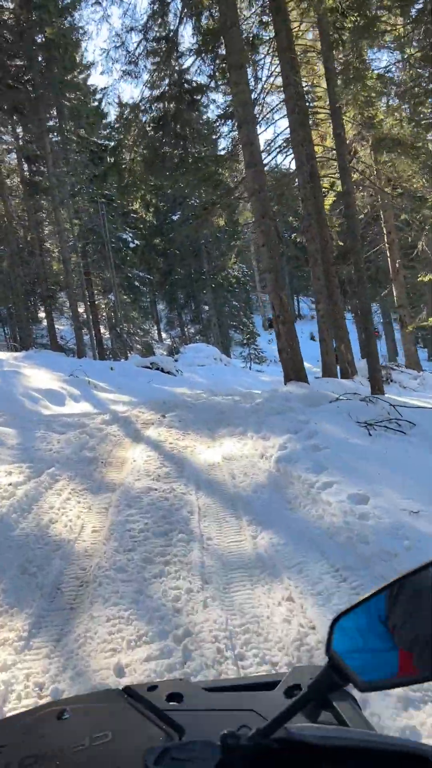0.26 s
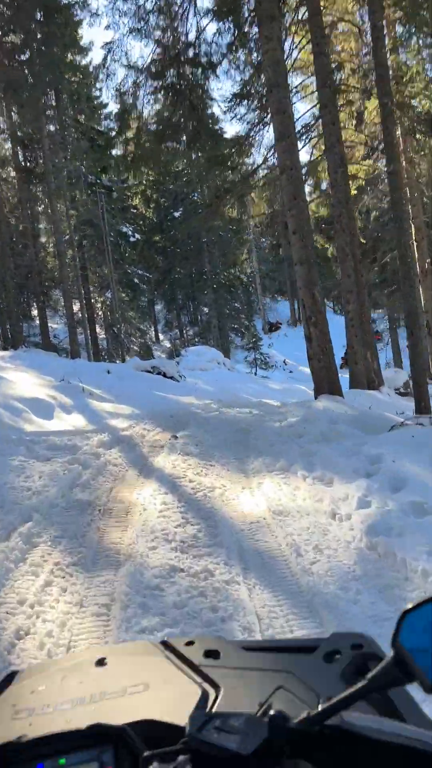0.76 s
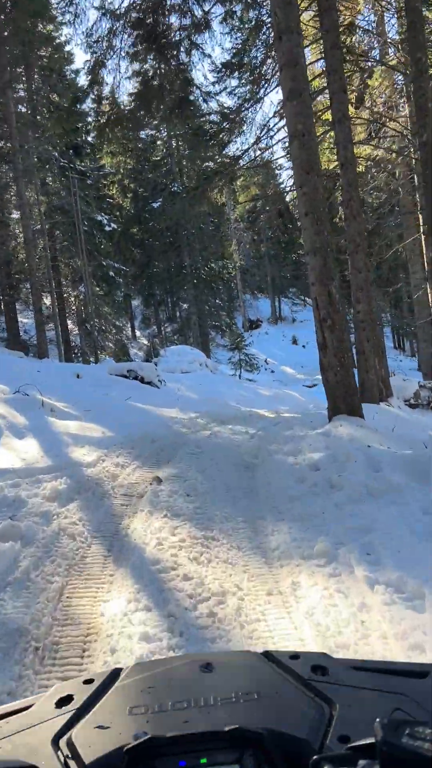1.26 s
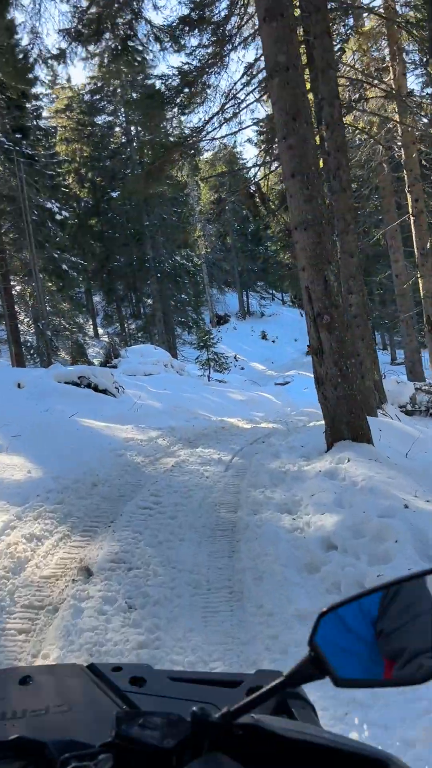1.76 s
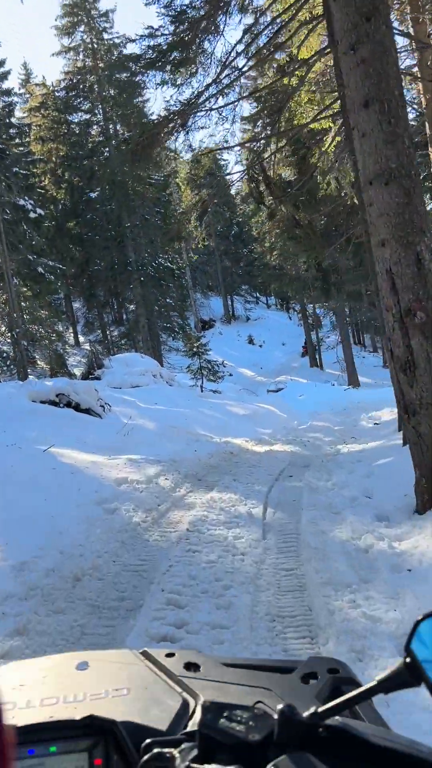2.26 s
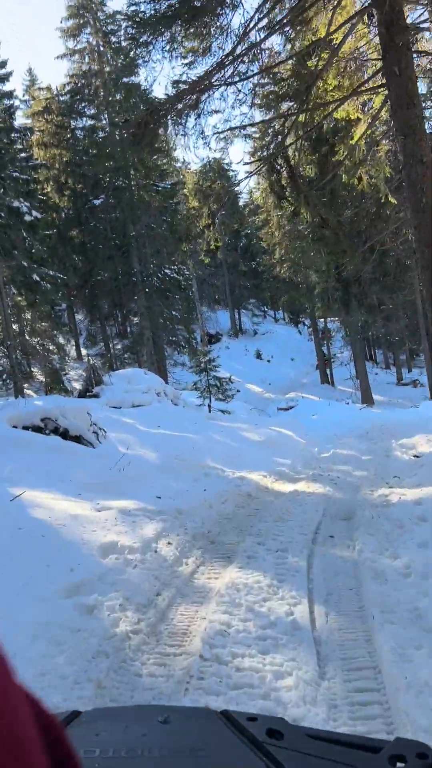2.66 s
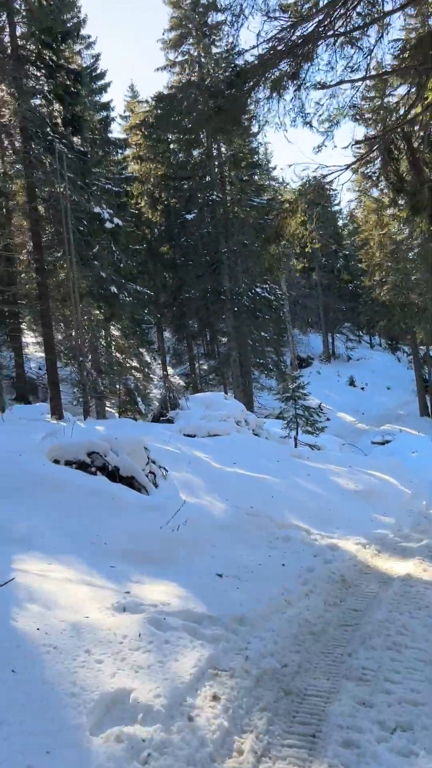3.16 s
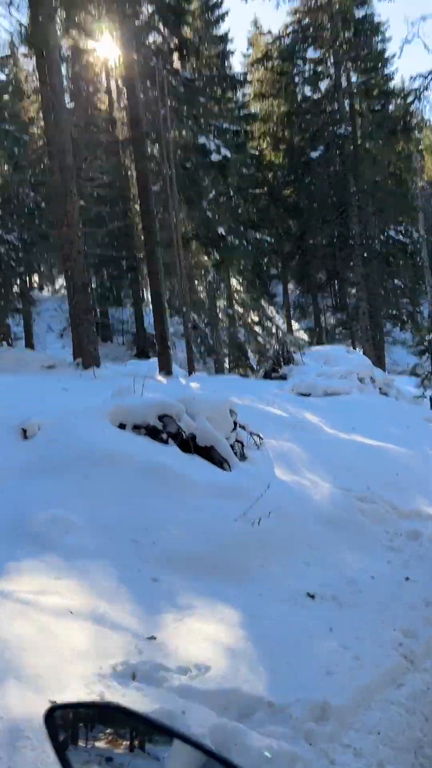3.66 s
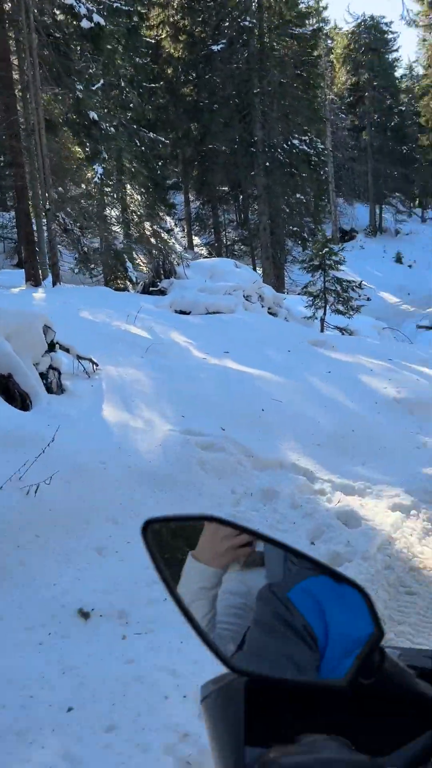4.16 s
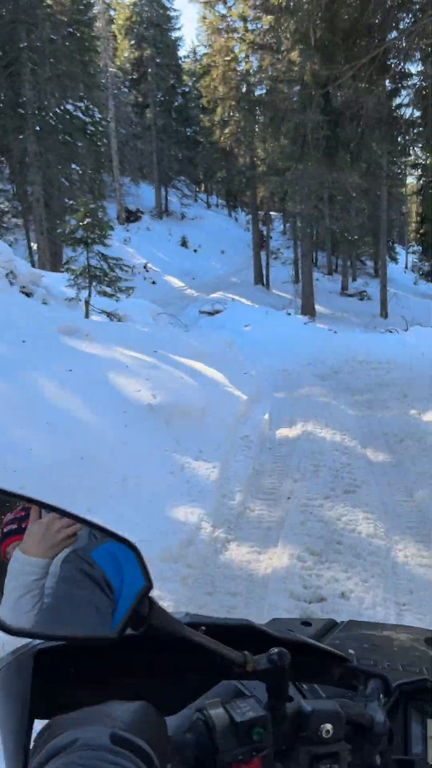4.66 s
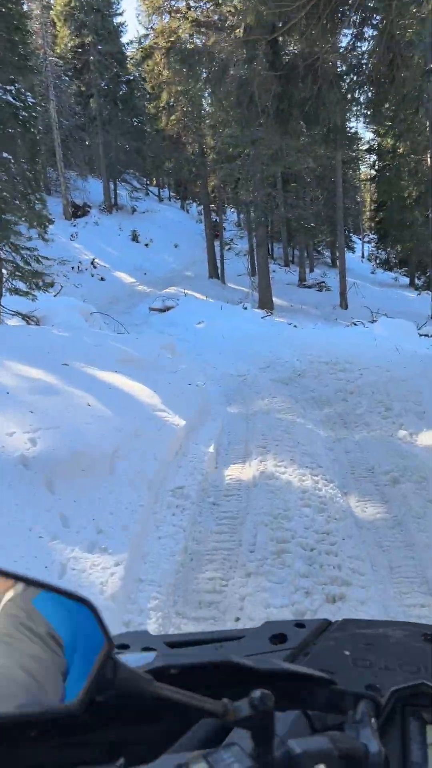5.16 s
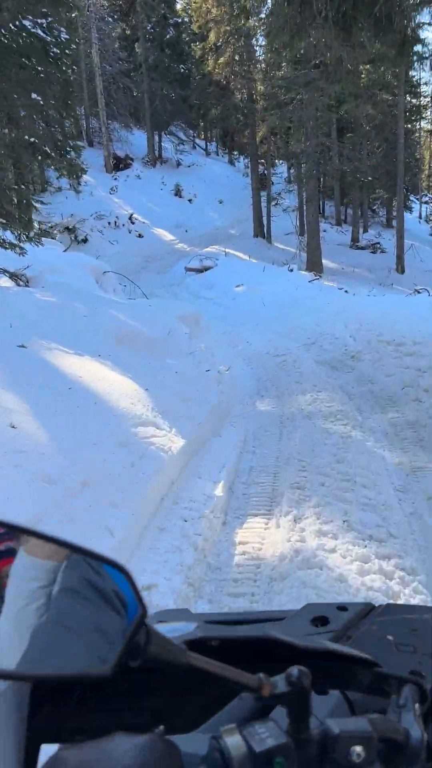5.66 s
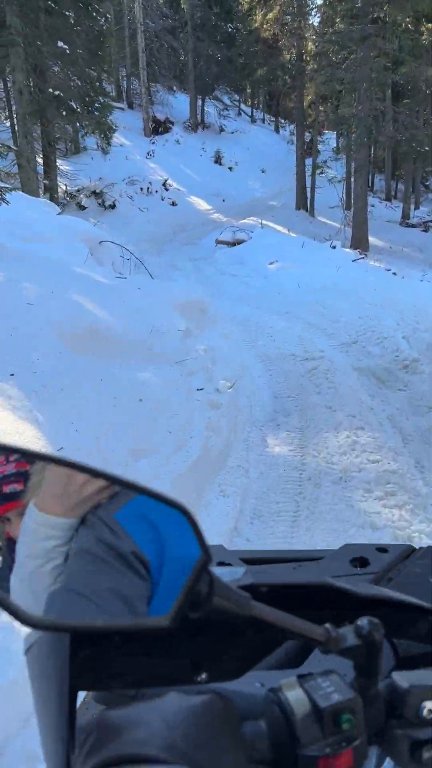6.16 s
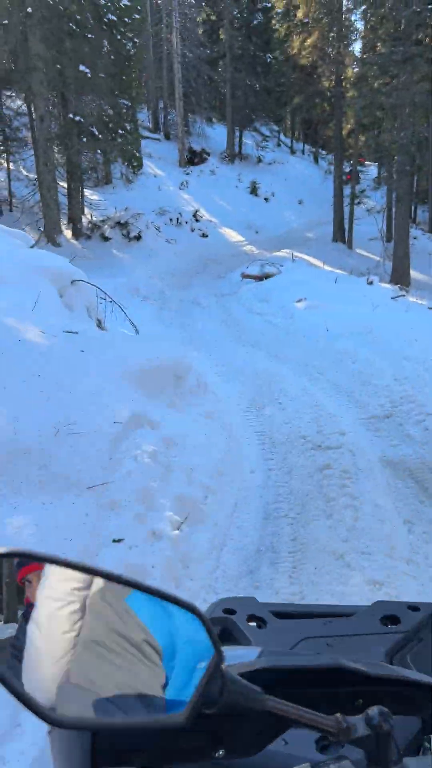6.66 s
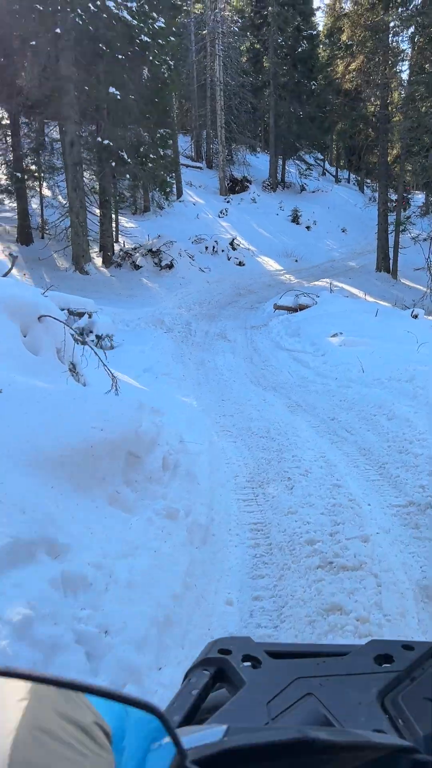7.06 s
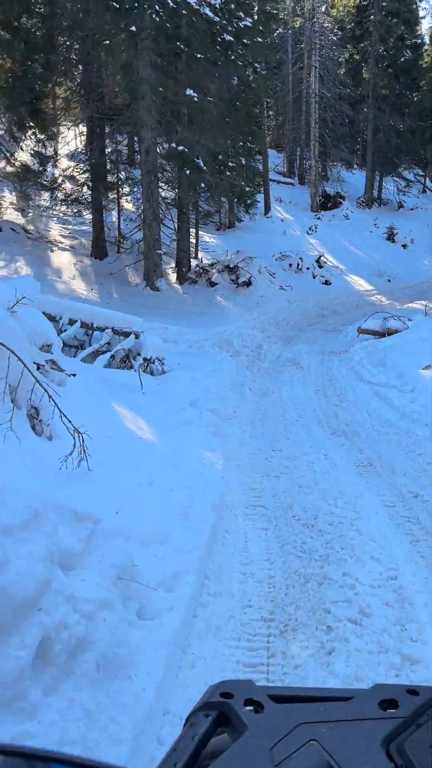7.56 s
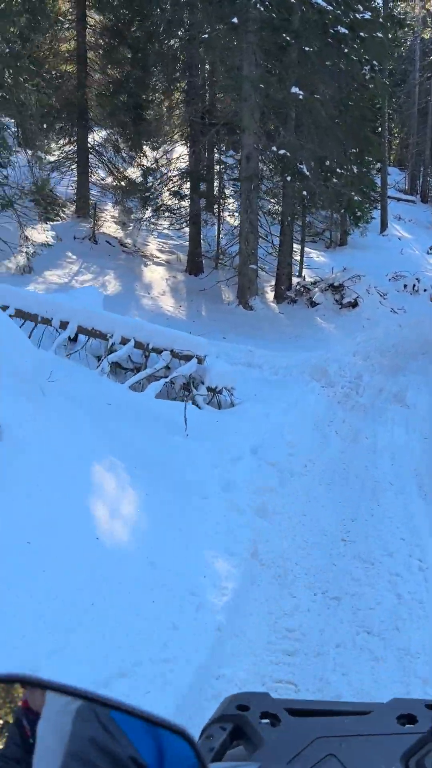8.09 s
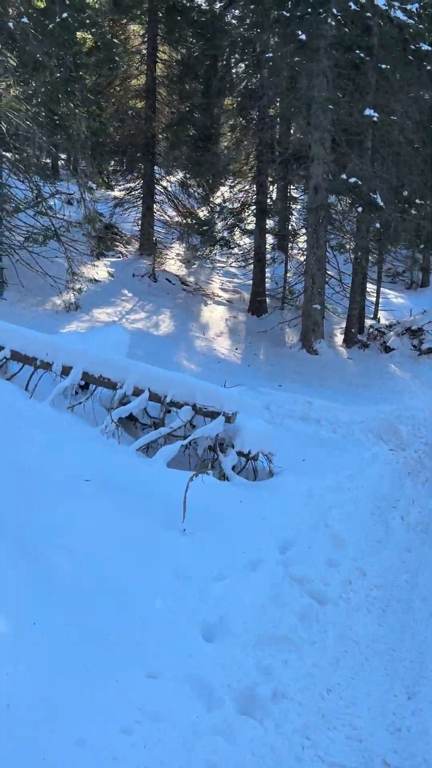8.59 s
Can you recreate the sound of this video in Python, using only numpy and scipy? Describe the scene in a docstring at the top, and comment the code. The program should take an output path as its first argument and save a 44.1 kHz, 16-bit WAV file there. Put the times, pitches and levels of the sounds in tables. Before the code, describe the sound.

Throaty single-cylinder engine growl on tracks, rising briefly, dropping with a burble and wind buffet, then chugging on over hissing snow.

```python
"""A single-cylinder four-stroke quad on tracks climbs a snowy forest trail, heard from a hand-held phone on the seat.
The exhaust drones on multiples of the firing rate, over a pulsing noise roar and a short burble.
Right by the microphones, covers and drive ring with each firing; lone multiples whine and a few tones glide.
The tracks thrum at a low resonance; snow hisses as coloured noise and crunches in short rough bursts.
A gust of low noise briefly buffets the phone's two microphone ports."""
import sys
import numpy as np
from scipy.fft import rfft, irfft, next_fast_len
from scipy.io import wavfile
from scipy.ndimage import uniform_filter1d, map_coordinates

SR = 44100
rng = np.random.default_rng(int(sys.argv[2]) if len(sys.argv) > 2 else 0)


def master(y):
    """Save y as 16-bit WAV."""
    cut = np.clip(np.atleast_2d(y).T, -1, 1)
    pcm = np.round(cut * 32767)  # scale
    wavfile.write(sys.argv[1], SR, pcm.astype(np.int16))


N = 389403  # samples

# engine speed along the climb: (time [s], firing rate [1/s])
ENGINE_SPEED = [(0.0, 39.87), (0.27, 41.8), (0.44, 42.42), (0.66, 40.87), (0.96, 40.2), (1.3, 40.12),
                (1.87, 40.72), (2.38, 40.35), (2.51, 39.42), (2.71, 35.48), (2.88, 35.0), (3.1, 34.85),
                (3.3, 34.06), (3.6, 33.88), (3.9, 34.68), (4.28, 37.08), (4.4, 37.46), (4.6, 36.27),
                (4.8, 35.58), (5.2, 35.62), (5.5, 34.8), (5.95, 35.5), (6.39, 33.6), (6.54, 35),
                (6.76, 35.75), (7.13, 36.22), (7.8, 36.36), (8.15, 34.29), (8.83, 34.02)]


def firing_phase():
    """Phase that gains one turn per firing; the crank speed flutters a little."""
    flutter = 1 + 0.0015 * wobble(12)
    return 2 * np.pi * np.cumsum(curves(ENGINE_SPEED)[0] * flutter) / SR


# slow, middle, fast and top firing rates: (firing rate [1/s])
REV_POINTS = (34, 37, 40.3, 42.3)


def by_revs(db):
    """A level given at slow, middle, fast and top revs, read at the present firing rate."""
    return np.interp(curves(ENGINE_SPEED)[0], REV_POINTS, db)


# exhaust at the seat: (time [s], drone on the 4th multiple [dB], thump on the 2nd multiple [dB])
EXHAUST_LEVELS = [(0.0, -16.5, -16), (0.27, -15, -14), (0.66, -20.5, -17.5), (1.3, -23, -18.5),
                  (1.87, -21.5, -16), (2.4, -22, -21.5), (2.52, -22, -32), (2.72, -24, -33),
                  (3.1, -23, -40), (3.35, -27.5, -30), (3.85, -22.5, -37), (4.3, -19, -24),
                  (4.75, -21.5, -30), (5.2, -20.5, -36), (5.5, -22.5, -43), (5.95, -20.5, -35),
                  (6.39, -25.5, -34), (6.65, -19.5, -45), (7.15, -20.5, -27), (7.8, -19.5, -36),
                  (8.15, -24.5, -38), (8.83, -26, -36)]
# growl of the low multiples around the drone: (time [s], gain [dB])
LOW_GROWL = [(0, -1), (.4, 0.5), (.8, -1), (2.3, -0.5), (2.7, 0.5), (3.4, -2.5), (3.9, 4.5), (4.3, 0.5),
             (4.7, -2), (5.3, -6), (5.9, -3), (6.4, 1), (6.65, 2.5), (7.2, -0.5), (7.8, -4), (8.2, 4.5),
             (8.83, 1.5)]
# low multiples sliding in and out of the exhaust's resonances:
# (multiple, then level against the drone at slow, middle, fast, top revs [dB])
LOW_MULTIPLES = [(3, -14.5, -9, -4.5, -17), (5, -18.5, -10, -3, -6), (6, -11, -8.5, -17.5, -7),
                 (7, -34, -10, -6.5, -7), (8, -5, -16.5, -10, -16)]
# higher multiples of the firing rate: (multiple, then level against the load at slow, middle, fast, top revs [dB])
HIGH_MULTIPLES = [(9, -9, -6, -4.5, -1), (10, -10.5, -10, -7, -4), (11, -14, -13, -7.5, -13),
                  (12, -12, -17, -9.5, -11), (13, -8, -13, -7.5, -7.5), (14, -12, -13, -5.5, -11),
                  (15, -20, -16, -17, -15), (17, -16, -19, -11.5, -8), (18, -13, -16, -6.5, -12),
                  (19, -17, -11, -13, -9), (20, -13, -19, -7, -16), (21, -10, -10, -24, -21),
                  (22, -16, -12, -23, -18), (24, -14, -10, -23, -24), (26, -20, -20, -18, -18),
                  (28, -18, -18, -22, -22), (30, -17, -17, -22, -22)]
SMEAR, LEAN, PIPE_LAG = .045, .5, 3.6  # push shape [rad per multiple squared, rad], lag behind the knock [rad]
FLIPPED = 6  # this multiple falls past a pipe resonance and comes out inverted


def drone(phase):
    """Exhaust push built from wavering multiples of the firing rate, on a direct and a scattered path."""
    level_db, thump_db = curves(EXHAUST_LEVELS)
    growl_db = curves(LOW_GROWL)[0]
    load_db = level_db + by_revs((-12.5, -13.5, -10, -15.5))
    levels = [(1, 0.5 * load_db + by_revs((-20.0, -19, -15.5, -16))), (2, thump_db), (4, level_db)]
    # the 8th multiple does not growl
    levels += [(k, level_db + by_revs(db) + (k != 8) * growl_db) for k, *db in LOW_MULTIPLES]
    levels += [(k, load_db + by_revs(db)) for k, *db in HIGH_MULTIPLES]

    multiple = np.array([k for k, db in levels])
    direct = LEAN + SMEAR * (multiple - 3) ** 2 - PIPE_LAG * multiple  # a drawn-out push
    direct = direct + np.pi * (multiple == FLIPPED) + rng.normal(0, .25, len(levels))
    scattered = direct + np.pi / 2
    start_phases = np.transpose([direct, scattered])[..., None]

    out = np.zeros((2, N))
    for (k, db), start in zip(levels, start_phases):
        waver = amp(.3 * np.sqrt(k) * wobble(7)) * np.exp(.03j * np.sqrt(k) * wobble(9))
        out += np.sqrt(2) * amp(db) * np.real(waver * np.exp(1j * (k * phase + start)))
    return out


# alternating strong and weak firings under load: (start [s], end [s], multiple below the line, level [dB])
HALF_MULTIPLES = [(.08, .55, 4, -26), (.1, 0.52, 5, -38), (1.2, 2.2, 4, -39), (.75, 2.25, 5, -41),
                  (0.5, 1.8, 6, -35.5), (1.3, 2.4, 7, -35)]


def halves(phase):
    """Uneven firings add slightly unsteady lines halfway between the low multiples."""
    def line(k):
        return np.sqrt(2) * amp(2.5 * wobble(6)) * np.sin((round(k) + .5) * phase + .5 * wobble(6))

    return [[1], [.6]] * sum(spell(a, b, 0.088) * amp(db) * line(k) for a, b, k, db in HALF_MULTIPLES)


# reference levels of the noisy layers, offset where used: (time [s], roar [dB], whine near 2 kHz [dB], treble [dB])
NOISY_LEVELS = [(0.0, -25.5, -33.5, -48.5), (0.22, -25.5, -32.5, -49), (0.64, -27, -37, -50),
                (0.93, -27.5, -35, -50), (1.94, -29, -39, -55.5), (2.29, -33, -38, -54),
                (2.75, -31, -43.5, -57), (3.2, -31.5, -38, -59), (3.27, -29.5, -41, -61),
                (3.39, -29.5, -43, -57.5), (3.86, -30.5, -39.5, -52), (4.25, -29, -35.5, -52.5),
                (4.77, -31.5, -36, -52), (6.08, -29, -36, -50), (6.29, -31, -36, -53),
                (6.71, -30, -37, -52), (8.31, -31, -37.5, -53.5), (8.73, -33, -42, -55.5),
                (8.81, -31, -42, -53), (8.83, -29, -46, -54)]


def running_db():
    """Reference levels of roar, whine and treble for every sample."""
    return curves(NOISY_LEVELS)


# exhaust roar as heard from the seat: (frequency [Hz], relative gain [dB])
ROAR_COLOUR = [(30, -34), (50, -7), (120, 0.5), (250, -1), (450, -4), (800, -7.5), (1100, -16.5),
               (1400, -17), (1900, -26.5), (2600, -61)]


def roar(phase):
    """Turbulent exhaust noise that swells with each firing and each crank turn."""
    pulse = amp(0.35 * np.cos(phase) + 0.58 * np.cos(2 * phase))
    return amp(running_db()[0] + 5.5) * noise(colour(ROAR_COLOUR), pulse)


# exhaust burbles as the throttle shuts: (time [s], level [dB], half-length [s])
BURBLES = [(2.41, -20.5, 0.045), (2.58, -33, 0.022)]
# silencer resonances: (frequency [Hz], width [Hz], relative level [dB])
SILENCER = [(328, 210, 20), (750, 280, -17)]


def burble():
    """Brief swells of noise ring the silencer."""
    return swells(BURBLES) * noise(modes(SILENCER))


# gliding tones as the throttle shuts: (start [s], end [s], from [Hz], to [Hz],
# peak level [dB], pitch unsteadiness [Hz], direct share [0-1])
GLIDES = [(2.72, 3.3, 1085, 1015, -36, 7, .9), (2.36, 2.6, 335, 270, -20, 14, .35),
          (2.42, 2.6, 265, 150, -20, 14, .35), (2.35, 2.49, 445, 410, -24, 14, .8),
          (2.2, 2.34, 650, 700, -33, 10, .8)]


def sigh():
    """Slightly rough tones that glide, most of them downwards, as the drive slows."""
    t = np.arange(N) / SR
    out = np.zeros((2, N))
    for a, b, hz, to_hz, db, rough_hz, direct in GLIDES:
        pitch = np.interp(t, (a, b), (hz, to_hz)) + rough_hz * wobble(60)
        level = spell(a, b, 0.056) * amp(db + 1.6 * wobble(30.2))
        out += [[direct], [direct - 1]] * level * np.sin(2 * np.pi * np.cumsum(pitch) / SR)
    return out


# multiples singing out in the casings: (start [s], end [s], multiple, level [dB]); silent if the end precedes the start
CASING_LINES = [(.03, 0.46, 43, -38.5), (.02, 0.27, 39, -38), (0.27, 0.46, 41, -38), (.8, 1.8, 46, -59),
                (.7, 1.55, 52, -62), (7.6, 7.9, 76, -52), (4.08, 4.68, 49, -41.5), (6, 4.7, 45, -47.5),
                (4.6, 5.9, 57, -55), (5.5, 4.9, 51, -54), (7.4, 7.9, 30, -63), (6.7, 7.9, 50, -48),
                (5.5, 7.75, 44, -59), (10, 8.8, 59, -54)]


def whines(phase):
    """Single high multiples of the firing rate, thin lines that ride on the engine speed."""
    def line(k):
        return np.sqrt(2) * amp(1.5 * wobble(12)) * np.sin(round(k) * phase + .4 * wobble(15))

    return [[1], [.2]] * sum(spell(a, b, 0.08) * amp(db) * line(k) for a, b, k, db in CASING_LINES)


def ringing(table, phase, regular, firing_db, turn_db, second=0):
    """A casing struck every firing, by `second` on the idle crank turn, and shaken by noise swelling with both."""
    def strike(lag):
        return np.diff(np.floor(phase / (2 * np.pi) + lag), prepend=0)

    blows = unit(strike(0) + second * strike(.5))
    shake = amp(firing_db * np.cos(phase) + turn_db * np.cos(2 * phase)) * rng.standard_normal((2, N))
    return unit(filtered([[regular], [0]] * blows + unit(shake), modes(table)))


# engine covers close to the seat: (frequency [Hz], width [Hz], relative level [dB])
COVER_MODES = [(730, 25, 39), (837, 120, 16)]
# their ring: (time [s], level [dB])
COVER_LEVEL = [(0, -23), (.17, -35), (.3, -42), (.6, -38), (1.0, -45), (2.4, -39), (2.6, -50), (4.3, -54),
               (8.83, -50)]


def covers(phase):
    """Engine covers ring to noise that swells with the firing."""
    return amp(curves(COVER_LEVEL)[0]) * ringing(COVER_MODES, phase, 0, 2.4, 1.3)


# belt housing: (frequency [Hz], width [Hz], relative level [dB])
BELT_MODES = [(1010, 97, 9), (868, 72, 10)]
# its rise and fall: (time [s], gain [dB])
BELT_GAIN = [(0, 0), (1.6, 4), (2.1, -6), (2.6, -7), (2.9, 0), (3.5, -3.5), (5.5, -0.5), (8.83, 2.5)]


def belt(phase):
    """The belt housing rings to blows and noise as its level follows the whine and the revs."""
    level_db = running_db()[1] + by_revs((-2, -1, -14, -2)) + curves(BELT_GAIN)[0]
    return amp(level_db) * ringing(BELT_MODES, phase, 0.5, 0.37, 0.87)


# clutch bell: (frequency [Hz], width [Hz], relative level [dB])
CLUTCH_MODES = [(1810, 137, 0)]


def clutch(phase):
    """The clutch bell is struck at each firing and more softly on the idle turn."""
    level_db = running_db()[1] + by_revs((-1.4, -3.5, -2.5, -1.5)) - 3
    return amp(level_db) * ringing(CLUTCH_MODES, phase, 1.4, .2, 1.2, second=.65)


# gear case: (frequency [Hz], width [Hz], relative level [dB])
DRIVE_MODES = [(1593, 94, 3.5)]


def drive(phase):
    """The gear case rings with every firing."""
    level_db = running_db()[1] + by_revs((-7, -9, -9.5, -13.5))
    return amp(level_db) * ringing(DRIVE_MODES, phase, 1.3, .8, 1.3)


# drive shaft housing: (frequency [Hz], width [Hz], relative level [dB])
SHAFT_MODES = [(2265, 104, 0)]


def shaft(phase):
    """The shaft housing rings at each firing and at half strength on the idle turn."""
    level_db = running_db()[1] + by_revs((-12, -9.5, -12, -11))
    return amp(level_db) * ringing(SHAFT_MODES, phase, 0.39, .2, .6, second=.5)


# gear cover: (frequency [Hz], width [Hz], relative level [dB])
GEAR_MODES = [(1982, 177, 0)]
# its ring: (time [s], level [dB])
GEAR_LEVEL = [(0, -39), (.5, -46.5), (1.3, -43), (1.8, -49.5), (2.7, -49.5), (3.0, -43.5), (3.9, -42),
              (4.3, -45.5), (4.7, -39.5), (6.4, -42), (7.3, -41), (7.9, -38.5), (8.83, -40)]


def gear_cover(phase):
    """The gear cover rings at each firing and more softly on the idle turn."""
    return amp(curves(GEAR_LEVEL)[0]) * ringing(GEAR_MODES, phase, 1.05, .4, 1.3, second=.4)


# a small panel: (frequency [Hz], width [Hz], relative level [dB])
PANEL_MODES = [(2510, 70, 0)]
# its buzzes: (start [s], end [s], level [dB])
PANEL_SPELLS = [(.12, .58, -46), (.78, 1.22, -48), (1.55, 2.45, -44.5)]


def panel(phase):
    """A small panel buzzes in unsteady spells, struck and shaken by the firing."""
    level = sum(spell(a, b, 0.13) * amp(db + 2.6 * wobble(9.1)) for a, b, db in PANEL_SPELLS)
    return level * ringing(PANEL_MODES, phase, 0.88, .5, .5)


def chatter_db():
    """Reference level of the valve gear, blended from whine and treble."""
    _, whine_db, treble_db = running_db()
    return 0.57 * whine_db + 0.47 * treble_db


# valve gear: (frequency [Hz], relative gain [dB])
VALVE_COLOUR = [(1500, -20), (2200, -0.5), (2450, 0), (2900, 3.5), (3400, 1), (4200, -4.5), (5300, -4),
                (6200, -13.5), (7500, -13.5), (9000, -23)]


def valves(phase):
    """Valve chatter as coloured noise, pulsing with the engine and flickering at random."""
    pulse = amp(0.7 * np.cos(phase) + 0.66 * np.cos(2 * phase) + 0.96 * wobble(40))
    return amp(chatter_db() + 5) * noise(colour(VALVE_COLOUR), pulse)


# luggage rack: (frequency [Hz], width [Hz], relative level [dB])
RACK_MODES = [(2580, 130, 7), (2663, 110, 6), (3000, 58, 1)]
# spells of rattle: (time [s], level [dB], half-length [s])
RACK_SPELLS = [(.3, -50, 0.61), (2.25, -50, 0.61), (3.1, -51, 0.33), (4.7, -44, 0.52), (6.0, -41, 0.46)]


def rack(phase):
    """The rack rings steadily beside the valve chatter and rattles louder in spells."""
    level = amp(chatter_db() + by_revs((-6, -5.5, -3, -9))) + swells(RACK_SPELLS)
    return level * ringing(RACK_MODES, phase, 0.75, 1.7, 0.95)


# lugs over the idler wheels: (frequency [Hz], width [Hz], relative level [dB])
THRUM_MODES = [(63, 24.6, 0)]
# track thrum before its random wander: (time [s], level [dB])
THRUM_LEVEL = [(0, -34), (1.2, -31), (2.3, -35), (2.6, -28), (2.9, -24.5), (3.4, -33), (3.9, -36),
               (4.6, -26), (5.85, -27.5), (6.8, -33), (8.1, -25.5), (8.83, -35)]


def thrum():
    """Track lugs hum as noise through a low resonance of wandering level."""
    return amp(curves(THRUM_LEVEL)[0] - 2.5 * wobble(2.63)) * noise(modes(THRUM_MODES))


# sheared snow beside the tracks: (frequency [Hz], relative gain [dB])
HISS_COLOUR = [(3000, -20), (5500, -3), (7000, 0), (10000, -2), (15000, -4.5)]


def hiss(phase):
    """Sheared snow hisses as bright noise that patters with the firing and at random."""
    patter = amp(1.2 * np.cos(phase) + 0.4 * wobble(3.74) + 0.94 * wobble(14) + 1.14 * wobble(60))
    return amp(running_db()[2] + 5.0) * noise(colour(HISS_COLOUR), patter)


# crust breaking and squeaking under a track: (time [s], level [dB], squeak [Hz])
CRUST_BREAKS = [(.185, -44, 12000), (0.75, -41, 13000), (1.043, -45, 13000), (1.744, -46, 7000),
                (2.395, -44.5, 6800), (2.5, -46, 11500), (2.624, -50, 7000), (2.684, -46, 8550),
                (2.863, -50, 13000), (4.39, -40, 13000), (4.41, -40, 12200), (4.6, -43, 14090),
                (5.832, -39, 14010), (6.55, -43, 14200), (6.665, -43, 14200), (6.736, -38, 14000),
                (6.829, -40, 13700), (8.218, -41, 13760)]
CRUNCH_S = 0.027  # width of a crunch between its 1/e points [s]
FAINT_COUNT, FAINT_DB = 10, 1  # faint crunches at random times, mean level above the treble [dB]


def crunches():
    """Crust breaks in short bursts of slipping noise around a rough squeak."""
    out = np.zeros((2, N))
    coarse = noise(colour([(4000, -2), (7000, 3), (9500, 0), (15000, -9.0)]))
    fine = noise(colour([(6000, -18), (11000, -19), (13000, -2), (15000, -3)]))
    faint = [.1, FAINT_DB - 2, 7000] + rng.random((FAINT_COUNT, 3)) * [N / SR - .2, 4, 7000]
    faint[:, 1] += running_db()[2][(faint[:, 0] * SR).astype(int)]
    t = np.arange(-round(CRUNCH_S * SR), round(CRUNCH_S * SR)) / SR
    bump = np.exp(-(2 * t / CRUNCH_S) ** 4)
    for s, db, hz in [*CRUST_BREAKS, *faint]:
        at = slice(round(s * SR) - len(t) // 2, round(s * SR) + len(t) // 2)
        slips = amp(8 * uniform_filter1d(rng.standard_normal(len(t)), size=40))
        roughness = np.cumsum(rng.normal(0, 0.12, len(t)))
        squeak = 0.45 * np.sin(2 * np.pi * hz * t + roughness)
        share = np.clip((hz - 9000) / 6500, 0, 1)  # higher squeaks come from finer crust
        crust = np.sqrt(1 - share) * coarse[:, at] + np.sqrt(share) * fine[:, at]
        out[:, at] += amp(db) * bump * unit(slips) * (crust + squeak)
    return out


# air puffs right on the ports: (time [s], level [dB])
AIR_PUFFS = [(0.96, -15), (2.045, -15), (2.13, -19), (2.228, -17), (2.302, -23), (2.35, -24), (2.42, -24),
             (2.468, -27), (2.56, -18), (2.84, -20)]
# lumpy air under the puffs: (time [s], level [dB], half-length [s])
LUMPY_AIR = [(2.42, -23.5, 0.33)]
# wind noise at the ports: (frequency [Hz], relative gain [dB])
BUFFET_COLOUR = [(60, -2), (150, 9.5), (320, 7.5), (800, -2.5), (1500, -19), (2200, -62)]
PUFF_S = 0.0093  # half-length of a puff [s]


def gust():
    """Low noise in short puffs and a lumpy swell pushes the two ports mostly against each other."""
    puffs = swells([(s, db, PUFF_S) for s, db in AIR_PUFFS])
    air = puffs + swells(LUMPY_AIR) * amp(3.5 * wobble(35.39))
    common, opposed = air * noise(colour(BUFFET_COLOUR))
    return np.array([0.5 * common + opposed, 0.5 * common - opposed])


# the two microphone ports: (frequency [Hz], likeness [0-1], left minus right [dB], phase lead of the left [rad])
PORT_PAIR = [(60, .955, -.8, -.1), (170, .9, -1.5, -.1), (340, .45, -2, 0), (600, .35, -3, -1.3),
             (720, .55, -4.5, -1.7), (1100, .65, -2, -.95), (1750, .99, -.7, 0), (2100, .95, -2.5, .8),
             (2340, .65, -7.5, 1.8), (2560, .85, 0, 2.7), (4200, .65, 0, 1.7), (4700, .55, -3.5, 1.1),
             (5300, .9, -.3, 1.7), (6000, .99, 0, 3.14), (8000, .88, 0, 6.28), (10200, .99, 0, 9.42),
             (12500, .88, 0, 12.57), (14900, .99, 0, 15.7)]


def ports(shared, apart):
    """Left and right port: a common and an unrelated part, offset in level and phase by the phone body."""
    f, alike, balance_db, lead = np.transpose(PORT_PAIR)

    def turn(hz):
        return np.arccos(np.clip(np.interp(hz, f, alike), 0, 1)) / 2

    def half(hz):
        return amp(np.interp(hz, f, balance_db) / 2) * np.exp(.5j * np.interp(hz, f, lead))

    def side(sign):
        parts = np.array([shared, sign * apart])
        return filtered(parts, lambda hz: half(hz) ** sign * [np.cos(turn(hz)), np.sin(turn(hz))]).sum(axis=0)

    return np.array([side(1), side(-1.053)])  # the right port departs slightly further


def amp(db):
    """Amplitude ratio of a level in dB."""
    return 10 ** (np.asarray(db) / 20)


def unit(x):
    """x scaled to rms 1."""
    return x / np.sqrt(np.mean(x ** 2) + 1e-20)


def curves(rows):
    """One value per sample for each column after the time."""
    s, *cols = np.transpose(rows)
    return [np.interp(np.arange(N) / SR, s, c) for c in cols]


def wobble(rate):
    """A smooth random curve, rate knots a second."""
    return map_coordinates(rng.standard_normal(int(N * rate / SR) + 4), [np.arange(N) * rate / SR])


def swells(table):
    """The sum of bell-shaped gains, one per (time [s], level [dB], half-length to 1/e [s]) row."""
    t = np.arange(N) / SR
    return sum(amp(db) * np.exp(-((t - s) / length) ** 2) for s, db, length in table)


def spell(start, end, fade):
    """A gain that fades in, holds and fades out."""
    t = np.arange(N) / SR
    return np.clip(np.minimum(t - start, end - t) / fade, 0, 1)


def filtered(x, response):
    """x times a complex response of frequency."""
    m = next_fast_len(N + SR // 2)
    return irfft(rfft(x, m) * response(np.fft.rfftfreq(m, 1 / SR)), m)[..., :N]


def colour(points):
    """Gain of (frequency [Hz], gain [dB]) points joined on a log axis."""
    f, db = np.transpose(points)
    return lambda hz: amp(np.interp(np.log(hz + 1), np.log(f), db, left=-120))


def modes(table):
    """Response of a body with (frequency [Hz], width [Hz], level [dB]) resonances, steep on both flanks."""
    return lambda f: sum(amp(db) * (1j * f * w / (c * c - f * f + 1j * f * w)) ** 2 for c, w, db in table)


def noise(response, gate=1):
    """Two unrelated noises under one gate, coloured, rms 1."""
    return unit(filtered(gate * rng.standard_normal((2, N)), response))


def scene():
    """Engine, casings, tracks and snow reach the ports around the phone body; the gust hits the ports directly."""
    phase = firing_phase()
    exhaust = drone(phase) + halves(phase) + roar(phase) + burble()
    casings = covers(phase) + belt(phase) + clutch(phase) + drive(phase) + shaft(phase)
    casings += gear_cover(phase) + panel(phase) + valves(phase) + rack(phase)
    tones = sigh() + whines(phase)
    tracks = thrum() + hiss(phase) + crunches()
    return ports(*(exhaust + casings + tones + tracks)) + gust()


def record(dry):
    """The phone rounds off the highest peaks and keeps nothing above its band limit."""
    rounded = dry / (1 + np.abs(dry / .93) ** 6) ** (1 / 6)
    return filtered(rounded, lambda hz: hz < 15700)


dry = scene()
out = record(dry)
master(out)
```